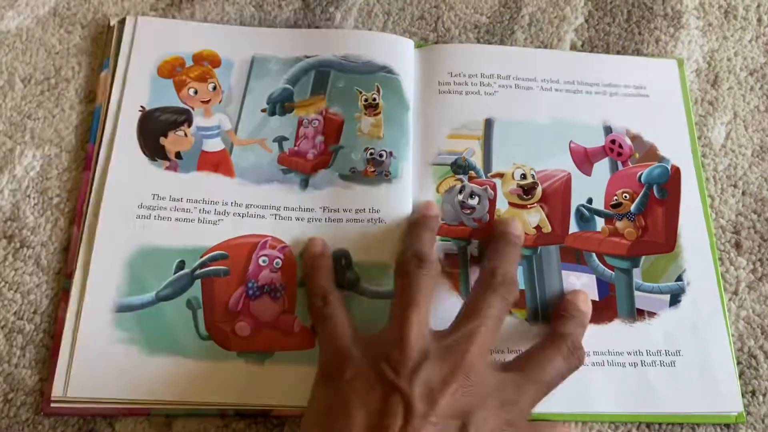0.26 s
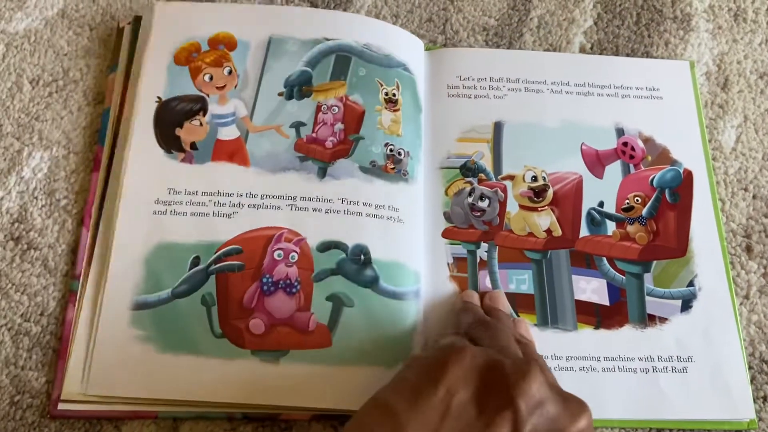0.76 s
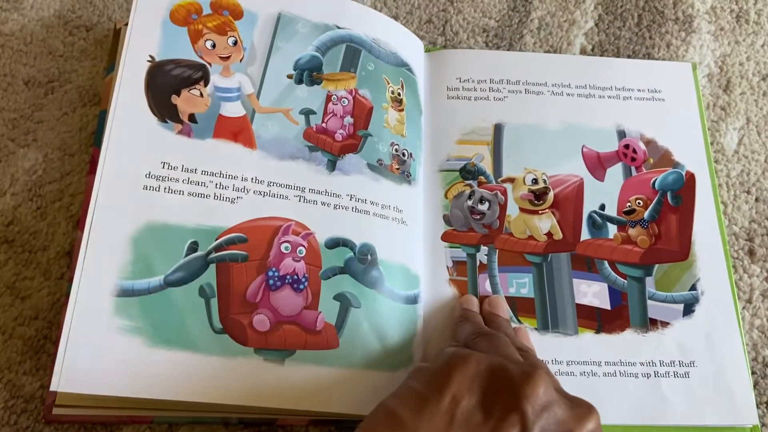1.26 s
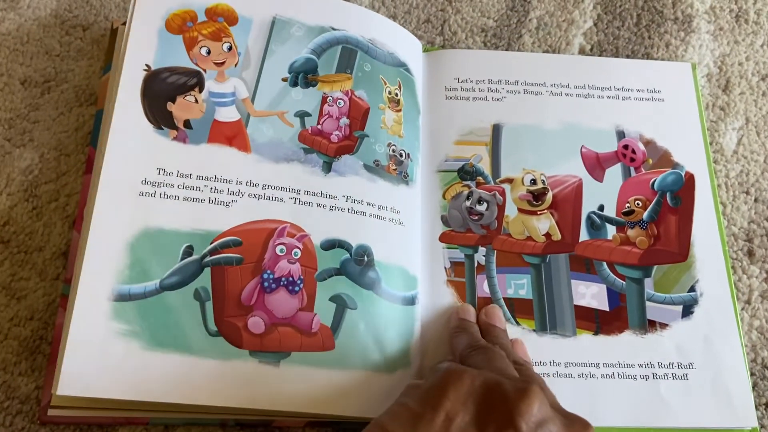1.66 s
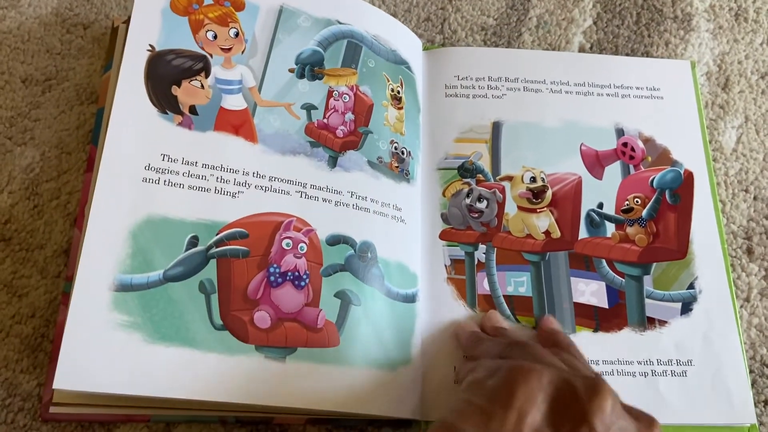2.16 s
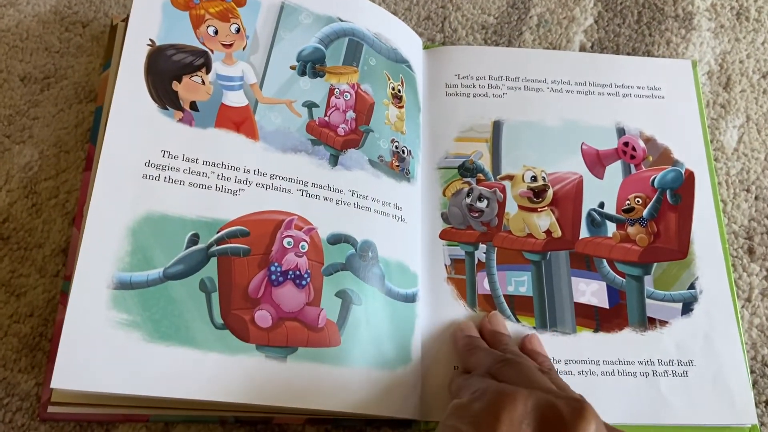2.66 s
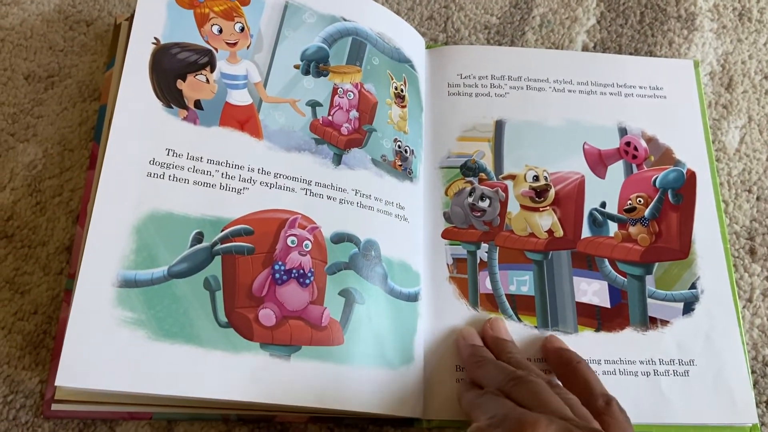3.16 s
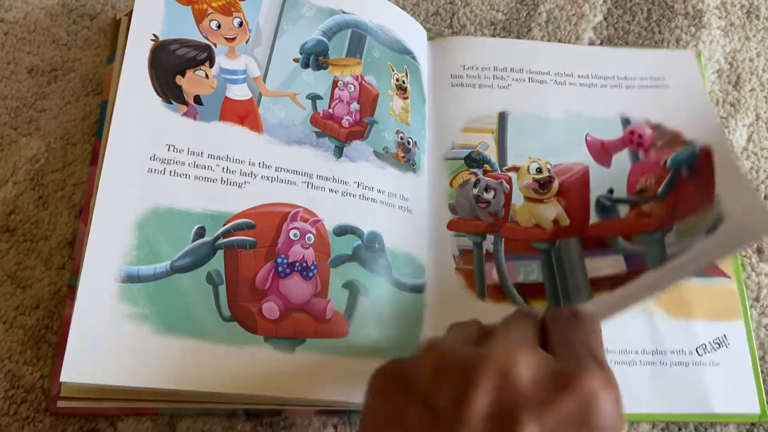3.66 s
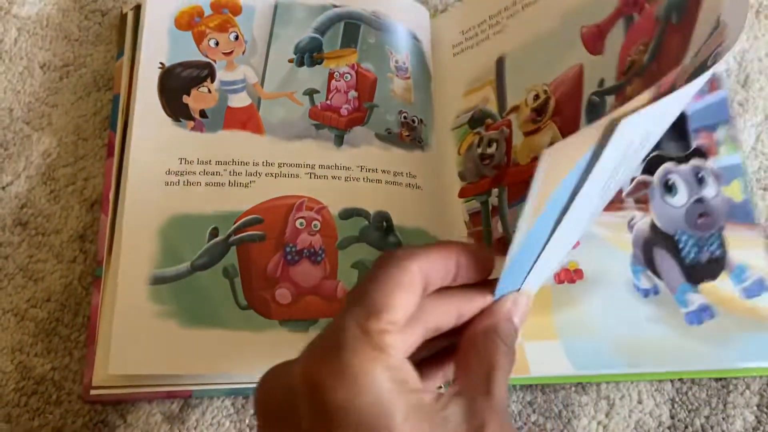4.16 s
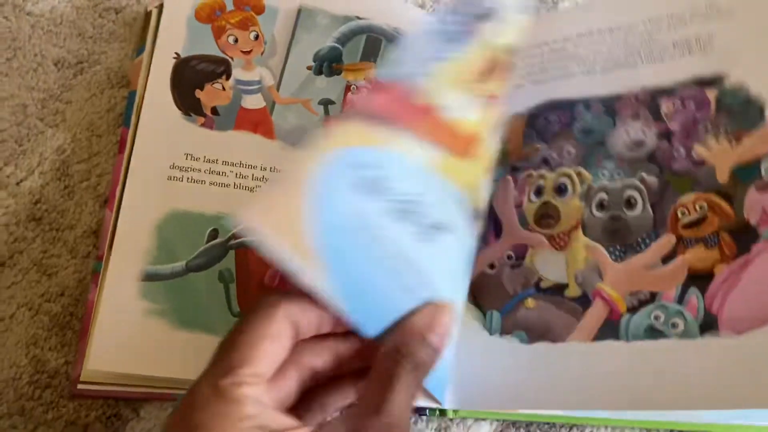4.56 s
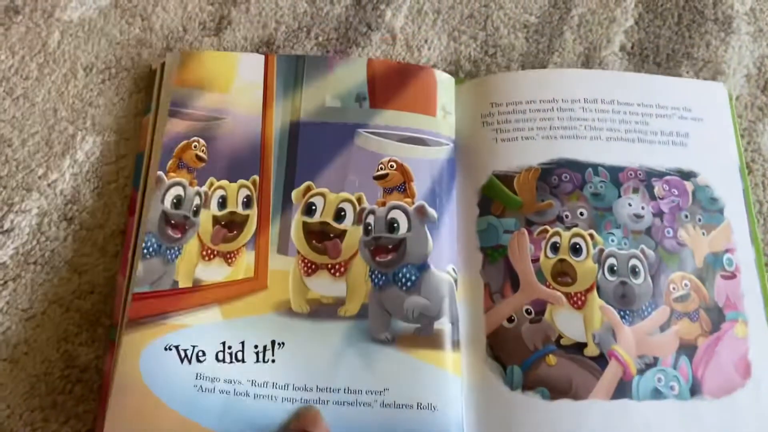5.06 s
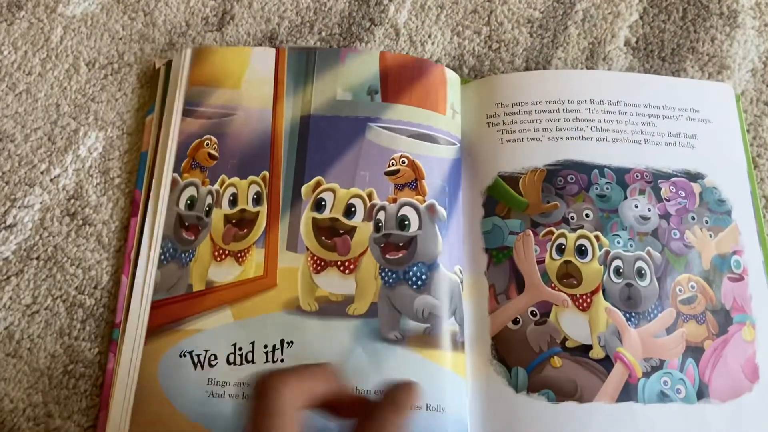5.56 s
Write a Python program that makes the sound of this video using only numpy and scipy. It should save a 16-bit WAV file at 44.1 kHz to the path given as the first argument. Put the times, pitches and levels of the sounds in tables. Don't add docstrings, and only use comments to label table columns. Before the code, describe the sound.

Close paper rustles and spine creaks, a sharp snap, a crisp noisy page turn, then dull knocks across a quiet carpeted room.

```python
import sys
import numpy as np
from scipy import signal
from scipy.fft import rfft, irfft, next_fast_len
from scipy.io import wavfile
from scipy.ndimage import uniform_filter1d

SR = 44100
rng = np.random.default_rng(int(sys.argv[2]) if len(sys.argv) > 2 else 0)


def elevation(decibels):
    levels = np.asarray(decibels, float)
    return 10 ** (levels / 20)


def digitize_waveform(pressure):
    field = np.atleast_2d(pressure).T
    bounded = np.clip(field, -1, 1)
    quanta = np.round(bounded * 32767).astype(np.int16)
    wavfile.write(sys.argv[1], SR, quanta)


N = 255709

# (frequency [Hz], level [dB])
PAPER_TONE = [(59, -1), (100, 3.5), (167, -0.5), (369, -7), (644, -9.5), (1150, -6.5), (1490, -8),
              (3420, -12.5), (7560, -15.5), (9170, -16.5), (10400, -17), (11900, -15.5), (13200, -14),
              (15700, -15.5), (16100, -60)]


def on_log(table, hz):
    f, v = np.transpose(table)
    return np.interp(np.log(hz + 1), np.log(f), v)


def shape(x, gain):
    n = next_fast_len(x.shape[-1])
    return irfft(rfft(x, n) * gain(np.fft.rfftfreq(n, 1 / SR)), n)[..., :x.shape[-1]]


def window(hz, lo_hz, hi_hz):
    return 1 / np.sqrt((1 + (lo_hz / (hz + 1)) ** 6) * (1 + (hz / hi_hz) ** 6))


def bands(spectrum, hz, edges_hz):
    masks = np.array([window(hz, lo, hi) for lo, hi in zip(edges_hz, edges_hz[1:])])
    parts = irfft(spectrum * masks)
    return parts / np.abs(parts).max(axis=1, keepdims=True)


def unit(x):
    return x / np.sqrt(np.mean(x ** 2))


def walk(rate):
    k = int(SR / rate)
    held = np.repeat(rng.standard_normal(3000)[:N // k + 1], k)
    return unit(uniform_filter1d(uniform_filter1d(held, k), k)[:N])


def place(pair, pan_db=0):
    # (frequency [Hz], phase [radians])
    port_lead = [(2000, 0), (4500, .7), (6880, 0), (17500, -15.7)]
    # (frequency [Hz], unrelated share [0-1])
    port_difference = [(40, 0.22), (120, 0.24), (700, 0.61), (1500, 0.52), (3000, 0.57), (5500, 0.79),
                       (7000, 0.5), (16000, 0.76)]
    n, sides = next_fast_len(N), np.array([[1], [-1]])
    hz = np.fft.rfftfreq(n, 1 / SR)
    lead = np.interp(hz, *np.transpose(port_lead))
    share = np.clip(on_log(port_difference, hz), 0, 1) * np.where(lead < 0, np.sin(lead) ** 4, 1)
    turn = np.exp(.5j * (lead - .44 * np.sin(2 * lead)) * sides)
    sound, twin = rfft(pair, n)
    mixed = np.sqrt(1 - share ** 2) * sound + sides * share * twin
    return irfft(turn * mixed, n)[:, :N] * elevation(pan_db * sides / 2)


def room(x):
    # (frequency [Hz], fade time [s])
    fade_times = [(100, 0.54), (500, 0.31), (2000, 0.43), (8000, 0.2)]
    t = np.arange(int(.7 * SR)) / SR
    tail = 0
    for hz in 60 * 2. ** np.arange(9):
        band = shape(rng.standard_normal((2, len(t))), lambda f: window(f, hz / 1.41, hz * 1.41))
        tail = tail + band * elevation(-60 * t / on_log(fade_times, hz)) * np.clip(t / 0.0011, 0, 1)
    return signal.fftconvolve(x[None], tail / np.linalg.norm(tail[0]), axes=1)[:, :N]


def swells(start, length, rise_db_s, fall_db_s):
    t = np.arange(0, N, 64)[None] / SR
    early = np.maximum(start[:, None] - t, 0)
    late = np.maximum(t - (start + length)[:, None], 0)
    return elevation((-rise_db_s * early - fall_db_s * late) * (0.1 / length[:, None]) ** 0.75)


def total(level_db, gains):
    power = elevation(2 * level_db) @ gains ** 2
    return np.sqrt(np.interp(np.arange(N), np.arange(0, N, 64), power))


def hush():
    # (frequency [Hz], level [dB per Hz])
    quiet_tone = [(18, -34), (30, 9), (70, 18.5), (155, -17.5), (390, 4), (565, -45), (1100, -16),
                  (6440, -28.5), (8850, -50), (11200, -28), (16700, -89)]
    level_db, sway_db = -64.5 - 6.5, 1.5
    whine_hz, whine_db = 6350, -97
    noise = unit(shape(rng.standard_normal((2, N)), lambda hz: elevation(on_log(quiet_tone, hz))))
    noise = noise * elevation(level_db + sway_db * walk(6.1))
    whine = unit(shape(rng.standard_normal(N), lambda hz: 1 / (1 + ((hz - whine_hz) / 70) ** 2)))
    return place(noise) + elevation(whine_db) * whine


def knocks():
    # (time [s], peak [dB], hardness [dB per octave])
    blows = [
        (4.822, -41, -4),
        (4.895, -39.5, -7.5),
        (5.166, -36.5, -6),
        (5.4223, -32, -2.5),
        (5.663, -32, -3),
    ]
    # (frequency [Hz], level [dB per Hz])
    rattle_tone = [(50, -17), (110, -8.5), (180, -9), (300, -5), (500, -5.5), (1000, -6.5), (2100, -20),
                   (2600, -29), (6000, -62)]
    # (frequency [Hz], level [dB], 60 dB fade time [s])
    board_modes = [(195.8, -51, 0.81), (264.1, -47.5, 0.97), (298.7, -49, 0.53), (395, -62, 0.46),
                   (460, -63, 0.27), (689, -52.5, 0.42), (820, -56, 0.56), (914, -63, .4),
                   (1290, -44, 0.45), (1660, -66.5, .3), (1910, -62, .3)]
    rise_s, board_rise_s, board_db, room_db = 0.0036, 0.029, 29.5, 3.5
    pair, boards, t = np.zeros((2, N + 9000)), np.zeros(N + 9000), np.arange(9000) / SR
    fade = np.exp(-t / 0.045) + 1.67 * np.exp(-t / 0.0088)
    rattle = rng.standard_normal((4, 2, len(t))) * fade * np.clip(t / rise_s, 0, 1)
    phases = rng.random(len(board_modes)) * 2 * np.pi
    ring = 0
    for (hz, db, t60), phase in zip(board_modes, phases):
        ring = ring + elevation(db - 60 * t / t60) * np.sin(2 * np.pi * hz * t + phase)
    ring = ring * (1 - np.exp(-t / board_rise_s)) * np.clip((t[-1] - t) / 0.058, 0, 1)
    for k, (s, peak_db, hard_db) in enumerate(blows):
        def hard(hz):
            return elevation(peak_db + hard_db * np.log2(hz / 500 + 0.22))
        blow = rattle[min(k, len(rattle) - 1)]
        blow = shape(blow, lambda hz: elevation(8.5 + on_log(rattle_tone, hz)) * hard(hz))
        pair[:, int(s * SR):][:, :len(t)] += blow
        boards[int(s * SR):][:len(t)] += elevation(board_db + 8.5) * shape(ring, hard)
    pair, boards = pair[:, :N], boards[:N]
    return place(pair + elevation(room_db) * room(pair[0]) + boards * [[1], [1]], 0.24)


def grip_strength():
    # (start [s], length [s], level [dB])
    shakes = [(0.134, 0.053, -48), (0.3, 0.1, -49.5), (0.506, 0.027, -50), (0.735, 0.032, -52.5),
              (1.139, 0.042, -46.5), (1.257, 0.01, -44), (1.36, 0.036, -51), (1.466, 0.019, -44.5),
              (1.585, 0.14, -46), (1.844, 0.023, -47), (1.98, 0.26, -46.5), (2.19, 0.097, -45.5),
              (3.287, 0.08, -43), (3.494, 0.056, -51), (3.804, 0.039, -41), (3.967, 0.097, -42),
              (4.178, 0.047, -46.5), (4.297, 0.19, -45.5), (4.784, 0.19, -46.5), (5.14, 0.4, -47.5),
              (5.662, 0.09, -42.5)]
    start, length, shake_db = np.transpose(shakes)
    gains = swells(start, length, rise_db_s=335, fall_db_s=155)
    return np.hypot(total(shake_db - 2.0, gains), elevation(-61.5))


def rumble():
    # (frequency [Hz], level [dB per Hz])
    grip_tone = [(12, -36), (20, -27), (35, -5), (54, 2), (79, -4.5), (119, -12.5), (156, -22.5),
                 (200, -13.5), (260, -30), (440, -120)]
    lumps = rng.standard_normal((2, N)) * elevation(1.7 * walk(14))
    return unit(shape(lumps, lambda hz: elevation(on_log(grip_tone, hz)) * window(hz, 32, 182)))


def scrapes():
    # (time [s], peak [dB], ringing [Hz], length [ms])
    drags = [(0.109, -32, 5500, 53), (1.372, -43, 2400, 10), (1.773, -44, 754, 130), (1.866, -42, 2200, 31),
             (1.955, -42.5, 4100, 78), (2.843, -34, 1140, 37), (3.639, -35, 2640, 40),
             (3.722, -33, 2350, 36), (3.8, -28.5, 1310, 40), (3.837, -17, 3460, 40),
             (3.896, -21.5, 1130, 14), (3.948, -21, 6100, 30), (3.952, -22, 3370, 30),
             (4.06, -30, 6000, 54), (4.373, -30, 950, 23), (4.385, -20, 1220, 40), (4.456, -14, 810, 46),
             (4.458, -15, 1420, 28), (4.59, -27.5, 990, 38), (5.02, -35, 3300, 9),
             (5.227, -19.5, 6630, 10.6), (5.592, -26.5, 1090, 7.2)]
    pair, n = np.zeros((2, N + 6000)), 6000
    for s, peak_db, ring_hz, ms in drags:
        chance = rng.standard_normal((3, n))
        u = np.arange(n) / SR / (ms / 4000)
        swell = u * np.exp(-u) * elevation(20 * uniform_filter1d(chance[2], size=120))
        width_hz = 250 + 0.16 * ring_hz
        sound = shape(chance[:2] * swell, lambda hz: 1 / (1 + (2 * (hz - ring_hz) / width_hz) ** 2))
        pair[:, int(s * SR):int(s * SR) + n] += elevation(peak_db - 12.5) * sound / np.abs(sound).max()
    return place(pair[:, :N])


def crumples():
    # (time [s], peak [dB], brightness [0 body, 1 sheet, 2 edge], length [ms])
    buckles = [(0.109, -36.5, 2.5, 41), (0.146, -37, 2, 21), (0.329, -47, -1.5, 9.7), (0.464, -39, 0.3, 16),
               (1.767, -38, 0.5, 23), (1.868, -42.5, 0.27, 68), (1.954, -50, -0.6, 60),
               (2.017, -44.5, 0.4, 49), (2.02, -50, 2.4, 85), (2.773, -48.5, 0, 70), (2.834, -44.5, 0, 29),
               (3.035, -40.5, 1.4, 82), (3.444, -45, -0.5, 30), (3.631, -38, 1.7, 110),
               (3.764, -37, 0.7, 45), (3.722, -34, 1.3, 34), (3.822, -42, 0.5, 12), (3.842, -46, -1, 50),
               (3.894, -20.5, 1.44, 22.5), (3.918, -24.5, 2.76, 91), (3.948, -22.5, 2.43, 42),
               (4.277, -33.5, 1.18, 28), (4.319, -29, 1, 14), (4.322, -31.5, 0.2, 35),
               (4.351, -29, 2.5, 23), (4.35, -25.5, 0.36, 54), (4.383, -21, 0.6, 19),
               (4.416, -32.5, 0.5, 18), (4.448, -27.5, 0, 51), (4.577, -31.5, 1.3, 31),
               (5.225, -26.5, 2.2, 12)]
    pair, n = np.zeros((2, N + 4096)), 4096
    hz, t = np.fft.rfftfreq(n, 1 / SR), np.arange(n) / SR
    for s, peak_db, bright, ms in buckles:
        colour_db = -13.5 * abs(np.arange(3) - bright)
        chance = rng.standard_normal((3, n))
        u = t / (ms / 4000)
        swell = u * np.exp(-u) * elevation(4.0 * uniform_filter1d(chance[2], 60) * 7.9)
        for k in (0, 1):
            crackle = rfft(chance[k] * swell) * elevation(on_log(PAPER_TONE, hz))
            parts = bands(crackle, hz, [200, 900, 3500, 17000])
            pair[k, int(s * SR):][:n] += elevation(peak_db - 3.0 + colour_db) @ parts
    return place(pair[:, :N] + elevation(-8.5) * room(pair[0, :N]))


def snap_colours():
    # (time [s], peak [dB], body thump [dB], edge [dB])
    spine_ticks = [(0.073, -29, -8.5, -15), (0.11, -30, -15.5, -6), (0.144, -40, -6, 0),
                   (0.164, -36.5, -6, -4), (0.187, -32, -10, -8), (0.204, -40, -10, -4), (0.211, -33, -16, -4),
                   (0.219, -34.5, -12, -4), (0.234, -29.5, -13, -4), (0.349, -48, 6.5, -4),
                   (0.651, -43.5, -8, -10), (0.67, -38.5, -2.5, 3), (0.715, -40.5, -4, 3), (0.833, -57, -2, 7),
                   (0.861, -47.5, -14, 4), (0.886, -45, -0.5, 1), (0.935, -45, -32, -6), (0.944, -43.5, -1, 6),
                   (0.972, -40, -3.5, 4), (1.002, -37.5, -7, -8), (1.138, -42.5, -31, -1),
                   (1.165, -52, -3, 11), (1.195, -52.5, 0, 6), (1.228, -49, -2, 0), (1.258, -59, 2, 0),
                   (1.324, -45, -16, 0), (1.371, -53, -9, 0), (1.3863, -31.5, -1.5, -1),
                   (1.411, -28, -9.5, -4.5), (1.453, -33.5, -7, -2), (1.488, -36, -8, 2),
                   (1.619, -52, -8, 4), (1.647, -41, -9, -4), (1.656, -36.5, -4.5, 4), (1.741, -44, 3.5, 2),
                (1.757, -46, -1.5, 0), (1.776, -43, 7, 3), (1.784, -41, -3, 0), (1.826, -44.5, -7, -6),
                (1.867, -43, -9, -3), (1.889, -44, -14, 2), (2.053, -38.5, -27, -8), (2.078, -41, -5.5, -6),
                (2.174, -46.5, 7, -6), (2.439, -50.5, -6.5, 2), (2.51, -48, -31, -3),
                (2.533, -49.5, -17, 3), (2.605, -47.5, -1.5, -9), (2.632, -57, 0, -5),
                (2.677, -56, -14, -2), (2.773, -50, -15, -2), (2.821, -47, -2.5, -2), (2.833, -48, 2, 0),
                (2.842, -47, 9, 6), (2.869, -48.5, 1, 0), (2.971, -37.5, -8.5, 3), (2.983, -37.5, -7, 1),
                (2.997, -40.5, -2.5, 3), (3.037, -52, -21, 14), (3.045, -31.5, -9.5, -2),
                (3.056, -37.5, -1, 1), (3.079, -36.5, -7, -5), (3.124, -46, -0.5, -3)]
    # sheet, crease and edge level [dB]
    spine_db = [-10.5, -33.5, -19.5]
    # (time [s], peak [dB], body thump [dB], sharpness [0 sheet, 1 crease, 2 edge])
    turning = [(0.4224, -32.5, -16, 0.23), (0.534, -45.5, -23, 1.3), (2.02, -41.5, -14, 2.56),
               (2.15, -32, -5, 0.33), (3.232, -56, 1, 0.1), (3.244, -48, -21, 1.3),
               (3.2602, -19.5, -16.5, 1.06), (3.428, -40.5, -12.5, 1), (3.434, -39, -3.5, -0.5),
               (3.505, -60, 5.5, 0.41), (3.76, -34, -12, 0), (3.879, -42, -9.5, 0.2), (3.777, -46, -15, 2),
               (3.79, -38, -25, 0), (3.797, -34, -24, 0.7), (3.823, -33.5, -37, 0.4), (3.83, -32, -27, 0.2),
               (3.894, -24, -53, 0.83), (3.923, -23, -36, 2), (4.319, -30, -14, 2.5),
               (4.388, -26, -20, 0.23), (4.373, -39.5, -10, 1), (4.4706, -26, -4.5, 1),
               (4.75, -60, 13, -1.5), (4.804, -51, 7.5, 0), (4.825, -40, 3, 0.5), (5.022, -54, -33, -3),
               (5.083, -49, -6.5, 0.3), (5.194, -31.5, -10.5, 2.47), (5.23, -29, -6.5, 2),
               (5.591, -49, -9, -0.5)]
    ticks = spine_ticks
    scatter_db = 3 * rng.standard_normal((len(ticks), 3))
    rows = []
    for (s, db, thump, edge), scatter in zip(ticks, scatter_db):
        rows.append((s, db - 3.5, thump, *(spine_db + scatter + [0, edge, edge])))
    for s, db, thump, sharp in turning:
        rows.append((s, db, thump, *(-16.5 * abs(np.arange(3) - sharp))))
    return rows


def snaps():
    # (frequency [Hz], width [Hz], level [dB])
    sheet_modes = [(409, 90, 25.5), (1120, 444, 18.5), (2183, 380, 10), (3350, 560, -28), (4660, 190, 8),
                   (8860, 1640, -13)]
    bending = .068
    first_slip, second_slip, second_slip_s = 7, -.55, .0012
    mono, n = np.zeros(N + 4096), 4096
    hz, t = np.fft.rfftfreq(n, 1 / SR), np.arange(n) / SR
    lag = np.exp(-4j * np.pi * bending * np.sqrt(hz))
    for s, peak_db, *colour_db in snap_colours():
        chance = rng.standard_normal((2, n))
        spring_back = np.roll(t == 0, int(SR * second_slip_s * elevation(chance[1, -1])))
        slips = first_slip * ((t == 0) + second_slip * spring_back)
        slips = slips + chance[0] * np.exp(-t / 0.00056) + 0.33 * chance[1] * np.exp(-t / 0.0048)
        modes = 0
        for (f, width, db), detune in zip(sheet_modes, chance[1]):
            modes = modes + elevation(.5 * db) / (1 + 2j * (hz - f * (1 + 0.081 * detune)) / (0.99 * width))
        parts = bands(rfft(slips) * (0.64 + modes) * lag, hz, [200, 700, 2800, 6000, 17000])
        snap = elevation(peak_db + 3.5 + np.array(colour_db)) @ parts
        mono[int(s * SR):][:n // 2] += snap[:n // 2]
    mono = mono[:N]
    echo = np.roll(mono, 90) * 0.44
    return place(np.array([mono, echo]) + elevation(-13.5) * room(mono), -2.1)


def rub(lo_hz, hi_hz, rate, scatter_db, flicker_db, patch_db, patch_rate, gloss_db=0):
    slips = (rng.random(N) < rate / SR) * elevation(scatter_db * rng.exponential(size=N))
    slips = unit(uniform_filter1d(slips, size=70))
    hiss = elevation(flicker_db * walk(40)) * rng.standard_normal((2, N))
    out = 0
    for k, hz in enumerate(np.geomspace(lo_hz, hi_hz, 7)[:-1]):
        top = hz * (hi_hz / lo_hz) ** (1 / 6)
        drive = (np.roll(slips, k // 2 * 9000) + 1.0) * hiss
        patch = patch_db * walk(patch_rate) + gloss_db * np.log2(hz / 6000)
        out = out + elevation(patch) * shape(drive, lambda f: elevation(on_log(PAPER_TONE, f)) * window(f, hz, top) ** 2)
    return unit(out)


def folds(pair):
    path_delays = [.0009, .0021, .0037]
    drift, echo = .1, .33
    n = np.arange(N)
    for s in path_delays:
        source = n - s * SR * (1 + drift * walk(6))
        late = np.array([np.interp(source, n, x) for x in pair])
        pair = (pair + echo * late) / np.hypot(1, echo)
    return pair


def bounce(x):
    delay_s, share = 0.000844, 0.024
    mixed = shape(x, lambda hz: 1 + share * np.exp(-2j * np.pi * hz * delay_s - hz / 12000))
    return mixed / np.sqrt(1 + share ** 2)


def stroking():
    # (start [s], length [s], slide [dB], gloss [dB per octave], weight on the book [dB])
    strokes = [(0.0, 0.11, -59, -4.5, -1), (0.126, 0.14, -54, 1.5, -3), (0.343, 0.17, -57.5, 2, -5.5),
               (0.657, 0.13, -84, -11, 27.5), (0.872, 0.16, -77.5, -6, 20), (1.15, 0.11, -80.5, -6, 17.5),
               (1.379, 0.13, -75, -5, 18), (1.66, 0.15, -73.5, 0, 10), (1.976, 0.041, -77, -13, 22.5),
               (2.161, 0.047, -69.5, -6, 13), (2.268, .12, -88.5, 0, -3), (2.446, 0.22, -82, -8.5, 14),
               (2.75, 0.14, -79, 1, 8), (2.96, 0.17, -79, -7, 14), (3.26, 0.056, -59, -7.5, -24),
               (3.437, 0.026, -55, -2, -3), (3.534, 0.13, -61.5, -4.5, -45), (3.726, 0.068, -59, -5, 0.5),
               (3.835, 0.05, -51, -9, -35), (3.896, 0.17, -45.5, -7.5, -47), (4.092, 0.13, -55.5, -8, -4.5),
               (4.27, 0.22, -66.5, -8, 13), (4.6, 0.097, -57, -1, -2.5), (4.767, 0.15, -66.5, -7.5, 10.5),
               (4.998, 0.079, -70, -9.5, 11), (5.129, 0.094, -53, -1.5, -14), (5.284, 0.039, -70, -2, -12),
               (5.52, 0.22, -59.5, -0.5, -1)]
    grip = grip_strength()
    start, length, slide_db, gloss, weight = np.transpose(strokes)
    gains = swells(start, length, rise_db_s=288, fall_db_s=185)
    slide = total(slide_db, gains)
    gloss_db = 20 * np.log10(total(slide_db + gloss, gains) / slide)
    flap = total(slide_db - 4 - 0.85 * gloss + 0.072 * weight, gains)
    press = np.hypot(total(slide_db + weight, gains), elevation(-19.5) * grip)
    hand = grip * rumble()
    hand += press * rub(132.0, 610, rate=94, scatter_db=2.0, flicker_db=3.5, patch_db=2.5, patch_rate=36)
    paper = flap * rub(423, 3180, rate=230, scatter_db=3.0, flicker_db=2.0, patch_db=0.0, patch_rate=18)
    paper += slide * rub(2570, 16200, rate=920, scatter_db=0.0, flicker_db=3.0, patch_db=1.65,
                         patch_rate=21, gloss_db=gloss_db)
    return place(hand + folds(paper))


def scene():
    return bounce(stroking() + crumples()) + snaps() + scrapes() + knocks() + hush()


def low_pass(x):
    return signal.sosfilt(signal.butter(12, 16850, fs=SR, output="sos"), x)


def record(dry):
    dry = signal.sosfilt(signal.butter(3, 35, "high", fs=SR, output="sos"), dry)
    dry = signal.sosfilt(signal.ellip(8, .2, 70, 16300, fs=SR, output="sos"), dry)
    return low_pass(dry)


dry = scene()
out = record(dry)
digitize_waveform(out)
```